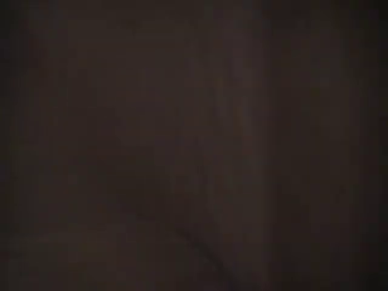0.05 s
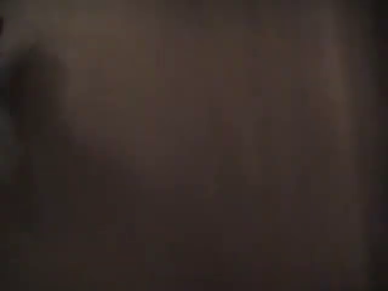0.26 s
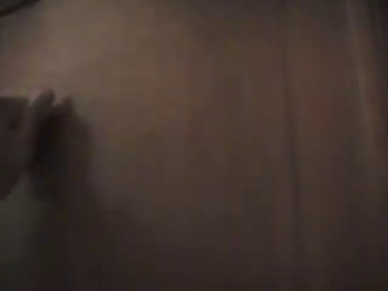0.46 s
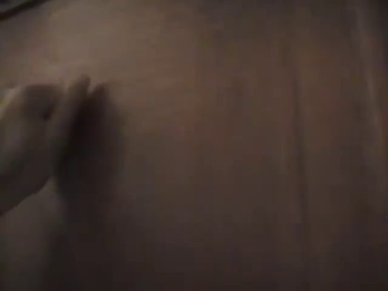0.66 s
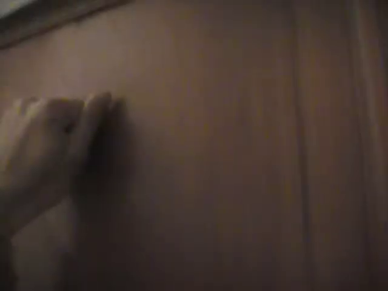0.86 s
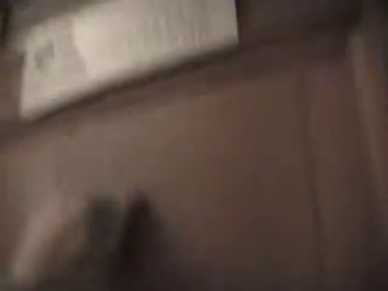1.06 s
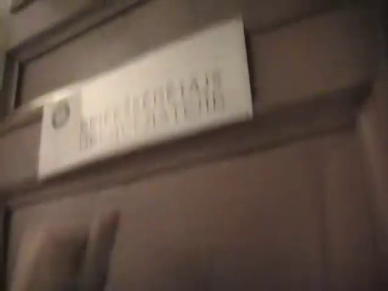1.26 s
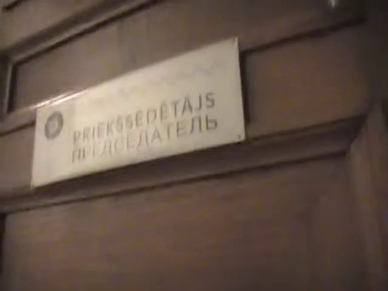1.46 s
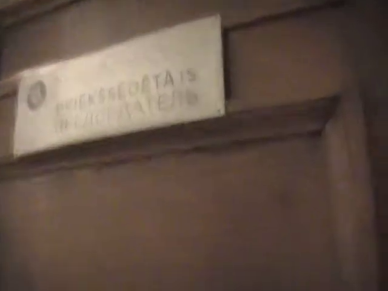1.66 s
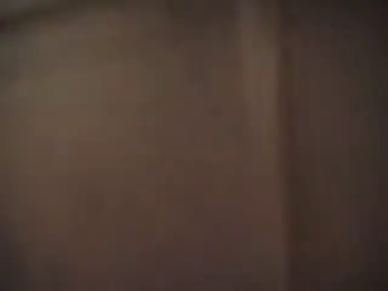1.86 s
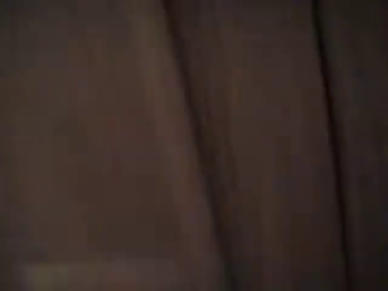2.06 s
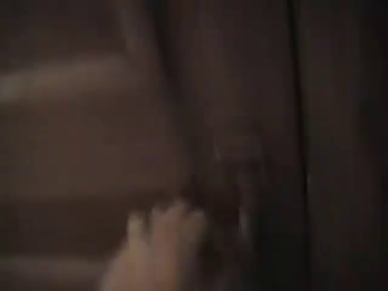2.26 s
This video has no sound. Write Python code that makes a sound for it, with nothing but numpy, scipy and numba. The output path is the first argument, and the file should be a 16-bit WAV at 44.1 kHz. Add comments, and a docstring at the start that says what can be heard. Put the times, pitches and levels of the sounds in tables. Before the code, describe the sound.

Close, loud, hollow door knocks in a bare reverberant hallway, stopping after about a second; then faint rubbing, a sharp metal latch click, a soft low bump and a handle clack, over light hiss from a small camera microphone.

```python
"""Knuckles rap quickly on a panelled wooden door in a bare, echoing corridor, close to a small camera:
each rap is a push that excites damped panel modes, dense wood vibration, one strong swing and a tick.
After a pause with soft scuffs (shaped noise) the latch clicks sharply (metal modes and noise bursts);
then the door bumps (a damped low tone) and the handle slides and clacks.
The camera's gain control turns loud knocks down and lets the quiet hiss swell back afterwards."""
import sys
import numpy as np
from scipy import signal
from scipy.fft import rfft, irfft, next_fast_len
from scipy.io import wavfile
from scipy.ndimage import uniform_filter1d
from numba import njit

SR = 44100
rng = np.random.default_rng(int(sys.argv[2]) if len(sys.argv) > 2 else 0)


def inscribe(sig):
    """Save sig as 16-bit PCM at rate SR to the path in sys.argv[1].

    A 1-D sig is mono; a 2-D sig holds one channel per row.
    Samples are clipped to [-1, 1] before scaling.
    """
    pcm = np.round(np.clip(np.atleast_2d(sig).T, -1, 1) * 32767)
    wavfile.write(sys.argv[1], SR, pcm.astype(np.int16))


N = 101253
T = np.arange(N) / SR
FREQS = np.maximum(np.arange(N // 2 + 1) * SR / N, 1)


def undb(db):
    """Logarithmic level: decibels to an amplitude factor."""
    return 10 ** (np.asarray(db) / 20)


def along(points, hz):
    """Spectral envelope: interpolate a table linearly on a log-frequency axis."""
    f, v = np.array(points, float).T
    return np.interp(np.log(hz), np.log(f), v)


def shape(x, gain):
    """Linear filtering: multiply the spectrum by a real gain that depends on frequency."""
    size = next_fast_len(x.shape[-1] + 4096, True)
    hz = np.maximum(np.arange(size // 2 + 1) * SR / size, 1)
    return irfft(rfft(x, size) * gain(hz), size)[..., :x.shape[-1]]


def fade(t60, size=N):
    """Exponential damping: the amplitude falls by 60 dB in t60 seconds."""
    return np.exp(-np.log(1000) * T[:size] / max(t60, 1e-4))


def add(out, x, start):
    """Superposition: mix a sound in at its time; what lies before time zero is cut off."""
    i = int(round(start * SR))
    x, i = x[:, max(-i, 0):], max(i, 0)
    n = min(x.shape[1], N - i)
    out[:, i:i + n] += x[:, :n]


# likeness of the two channels: (frequency [Hz], correlation [-1 to 1])
CHANNEL_LIKENESS = [(100, 0.9), (300, 0.91), (700, 0.5), (1400, 0.072), (2800, -0.13), (6000, -0.13),
                    (12000, -0.3)]


def noise(colour, size=N):
    """Spatial coherence: coloured stereo noise, rms 1, whose channels are more alike in the bass."""
    a, b = rng.standard_normal((2, size))

    def like(hz):
        return np.clip(along(CHANNEL_LIKENESS, hz), -.99, .99)

    mid = shape(a, lambda hz: undb(along(colour, hz)) * np.sqrt(1 + like(hz)))
    side = shape(b, lambda hz: undb(along(colour, hz)) * np.sqrt(1 - like(hz)))
    out = np.array([mid + side, mid - side])
    return out / out.std()


# spectrum of building air and microphone hiss: (frequency [Hz], relative density [dB])
AIR_SPECTRUM = [(25, -0.5), (200, 1.5), (600, 3.5), (1500, -4.5), (7500, -16.5), (11000, -13.5),
                (15500, -27)]
AIR_DB = -50


def air():
    """Stationary random noise: building air and microphone hiss as one steady coloured noise."""
    return undb(AIR_DB) * noise(AIR_SPECTRUM)


# widths [Hz] over which the spectrum of the echo is averaged
FINE_HZ, BROAD_HZ = 16, 110


def diffuse(x):
    """Modal overlap: even out narrow peaks, so that no single note of an echo stands out."""
    size = 2 * x.shape[1]
    spectrum = rfft(x, size)
    power = np.mean(np.abs(spectrum) ** 2, axis=0)
    broad, fine = (np.abs(uniform_filter1d(power, int(hz * size / SR))) for hz in (BROAD_HZ, FINE_HZ))
    return irfft(spectrum * np.sqrt(broad / fine), size)[:, :x.shape[1]]


# late decay of the corridor: (frequency [Hz], t60 [s])
CORRIDOR_T60 = [(100, 0.72), (250, 0.89), (1500, 0.9358), (4000, 0.95), (11000, .25)]
# colour of the corridor: (frequency [Hz], relative level [dB])
CORRIDOR_COLOUR = [(50, -11.5), (130, 4), (280, 2), (900, -8.5), (1900, -4), (2900, -8), (12000, -3.5)]
ROOM_BUILD_S = 0.0013  # time constant of the onset
EARLY_DB, EARLY_T60_S = 2.5, 0.096  # first reflections from the near walls


def corridor(size=42000):
    """Reverberation: octave bands of noise build up and each die at their own pace."""
    white = noise([(20, 0), (20000, 0)], size=size)
    centres = 62.5 * 2 ** np.arange(9)
    early = undb(EARLY_DB) * fade(EARLY_T60_S, size=size)
    onset = 1 - np.exp(-T[:size] / ROOM_BUILD_S)
    out = 0
    for k, centre in enumerate(centres):

        def octave(hz):
            crossfade = np.interp(np.log(hz), np.log(centres), np.arange(9) == k)
            return crossfade * undb(along(CORRIDOR_COLOUR, hz))

        tail = (fade(along(CORRIDOR_T60, centre), size=size) + early) * onset
        out = out + shape(white, octave) * tail / np.sqrt(np.sum(tail ** 2))
    return diffuse(out)


def in_room(x, room, wet_db):
    """Convolution with an impulse response: a sound followed by its echo."""
    out = undb(wet_db) * signal.fftconvolve(x[:1], room, axes=1)  # the left channel feeds the echo
    out[:, :x.shape[1]] += x
    return out


NEAR_SIDE_DB = -6  # a near source is more alike in the two channels than its echo


def burst(colour, t60, size=8192):
    """High modal density: a sudden, decaying spray of vibration close to the microphones."""
    x = noise(colour, size=size) * fade(t60, size=size)
    mid = x.mean(axis=0)
    return mid + undb(NEAR_SIDE_DB) * (x - mid)


def struck(colour, t60, room, wet_db):
    """Direct and reverberant sound: a burst, followed by a smooth echo of the same colour."""
    direct = burst(colour, t60)
    # the coloured echo is scaled to the energy of the burst
    gain = np.sqrt(np.sum(direct ** 2) / 2 / np.mean(undb(along(colour, FREQS)) ** 2))
    out = undb(wet_db) * gain * shape(room, lambda hz: undb(along(colour, hz)))
    out[:, :direct.shape[1]] += direct
    return out


# scuffs: (time [s], low rub level [dB], hiss level [dB], hiss cut-off [Hz], rise [s], t60 [s])
SCUFFS = [(1.15, -67, -52, 13100, 0.34, 4.5), (1.431, -32.5, -38, 6200, 0.0037, 0.34),
          (1.955, -30, -41.5, 12000, 0.046, 0.28), (2.198, -50.5, -41, 14200, 0.027, 1.4)]
# spectrum of the dull rub: (frequency [Hz], relative level [dB])
RUB_SPECTRUM = [(100, -22), (300, 8.5), (650, 7), (1200, -5), (3000, -11), (12000, -56.5)]
# spectrum of the sliding hiss before its cut-off: (frequency [Hz], relative level [dB])
SWISH_SPECTRUM = [(500, -30), (1500, -3), (4300, 4.5), (7000, 1), (11000, 9), (16000, 0.5)]
GRIT_DB, GRIT_S = 2.5, 0.001  # rms of the hiss's level flutter, and its averaging time


def scuffs(size=44000):
    """Friction noise: a dull rub and a gritty hiss swell and die away together."""
    out = np.zeros((2, N))
    for start, rub_db, hiss_db, top_hz, rise, t60 in SCUFFS:
        swell = np.minimum(T[:size] / max(rise, 1e-3), 1) * fade(t60, size=size)
        grit = uniform_filter1d(rng.standard_normal(size), max(int(GRIT_S * SR), 1))
        hiss = shape(noise(SWISH_SPECTRUM, size=size), lambda hz: 1 / np.hypot(1, (hz / top_hz) ** 4))
        hiss = hiss * undb(GRIT_DB * grit / grit.std())
        rub = noise(RUB_SPECTRUM, size=size)
        add(out, swell * (undb(rub_db) * rub + undb(hiss_db) * hiss), start)
    return out


BUMP_S, BUMP_HZ, BUMP_DB = 2.1975, 231, -15
BUMP_T60_S, BUMP_RISE_S, BUMP_ROOM_DB = 0.026, 0.0034, -1


def bump(room, size=8192):
    """Damped resonance: a soft, low bump on the door, one tone that rises and dies quickly."""
    out, t = np.zeros((2, N)), T[:size]
    rise = 1 - np.exp(-t / BUMP_RISE_S)
    thud = -np.sin(2 * np.pi * BUMP_HZ * t) * fade(BUMP_T60_S, size=size) * rise
    add(out, undb(BUMP_DB) * in_room(np.array([thud, thud]), room, BUMP_ROOM_DB), BUMP_S)
    return out


# latch clicks and rattles: (time [s], metal level [dB], door body level [dB])
CLICKS = [(1.8316, -39, -65), (1.8770, -16, -30.5), (1.8797, -23, -28.5), (1.898, -35, -30),
          (1.979, -42, -38), (2.043, -48, -52), (2.2872, -23, -57), (2.2903, -20, -27)]
# spectrum of the metal snap: (frequency [Hz], relative level [dB])
METAL_SPECTRUM = [(100, -11), (400, -10), (900, 7), (1700, 9), (2800, 0), (8000, 2), (11000, 4),
                  (16000, -6)]
METAL_T60_S, METAL_ROOM_DB = 0.026, -3
# spectrum of the jolted door body: (frequency [Hz], relative level [dB])
BODY_SPECTRUM = [(50, -22), (120, 3.5), (500, -0.5), (800, 6.5), (1200, -4), (3500, -13.5), (14000, -43)]
BODY_T60_S, BODY_ROOM_DB = 0.18, 5.5
# ringing modes of the latch: (frequency [Hz], relative level [dB])
LATCH_MODES = [(790, -1.5), (9620, 0), (10050, -19), (12550, -12)]
LATCH_DB, LATCH_T60_S = -7.5, 0.015


def latch(room, size=8192):
    """Impact excitation: metal snaps against metal, rings briefly, jolts the door and rattles."""
    out = np.zeros((2, N))
    modes = sum(undb(db) * np.sin(2 * np.pi * hz * T[:size]) for hz, db in LATCH_MODES)
    ring = undb(LATCH_DB) * fade(LATCH_T60_S, size=size) * modes
    for start, metal_db, body_db in CLICKS:
        snap = struck(METAL_SPECTRUM, METAL_T60_S, room, METAL_ROOM_DB)
        # swapped echo channels set the body's echo apart from the metal's
        jolt = struck(BODY_SPECTRUM, BODY_T60_S, room[::-1], BODY_ROOM_DB)
        add(out, undb(metal_db) * np.array([ring, ring]), start)
        add(out, undb(metal_db) * snap, start)
        add(out, undb(body_db) * jolt, start)
    return out


# faint taps between the knocks: (time [s], level [dB])
FAINT_TAPS = [(0.734, -32), (0.924, -36)]
# spectrum of a tap: (frequency [Hz], relative level [dB])
TAP_SPECTRUM = [(2000, -22.5), (2800, 3), (3500, -28), (14000, -28)]
TAP_T60_S = 0.013


def taps():
    """Transient excitation: faint, short bursts of narrow-band noise, without echo."""
    out = np.zeros((2, N))
    for start, db in FAINT_TAPS:
        add(out, undb(db) * burst(TAP_SPECTRUM, TAP_T60_S), start)
    return out


# door modes: (frequency [Hz], relative level [dB], t60 [s])
DOOR_MODES = [(122.7, -19.5, 0.2), (152.9, -19.5, 0.28), (207.3, -22, 0.35), (242, -16.5, 0.1),
              (384.4, -12, 0.085), (482, -2.5, 0.068), (527.7, -5.5, 0.053), (598.5, -10.5, 0.062),
              (648, -8, 0.06), (790.5, -10, 0.12), (874, -6.5, 0.11), (1138, -10, 0.019),
              (1441, 0.5, 0.054)]
DOOR_DB = -3.5
MODE_PAN_DB, MODE_PHASE = -2.5, 0.36  # level difference of the channels; phase either way [rad per kHz]


def panel(size=16384):
    """Modal superposition: damped door modes reach the two microphones a little differently."""
    out, side = np.zeros((2, size)), np.array([[1], [-1]])
    for hz, db, t60 in DOOR_MODES:
        lag = side * MODE_PHASE * hz / 1000
        wave = np.cos(2 * np.pi * hz * T[:size] - lag)
        out += undb(db + side * MODE_PAN_DB / 2) * fade(t60, size=size) * wave
    return undb(DOOR_DB) * out


THRUST_DB = -8


def thrust(hz, size=512):
    """Elastic recoil: the panel gives under the knuckle and springs back in one strong swing."""
    turn = np.minimum(T[:size] * hz * 2 / 3, 1)  # over after 1.5 periods of hz
    swing = np.sin(2 * np.pi * turn) * np.sin(np.pi * turn)
    return undb(THRUST_DB) * np.array([swing, swing])


# centres [Hz] and widths [octaves] of the three mode groups that depend on the place struck
LOW_HZ, MIDDLE_HZ, UPPER_HZ = 358.5, 754, 1206
LOW_OCTAVES, MIDDLE_OCTAVES, UPPER_OCTAVES = 0.32, 0.5, 0.14


def place_gain(hz, low_db, middle_db, upper_db):
    """Mode-shape weighting: the place struck sets how strongly each group of modes answers."""
    def bell(centre, octaves):
        return np.exp(-.5 * (np.log2(hz / centre) / octaves) ** 2)

    return undb(low_db * bell(LOW_HZ, LOW_OCTAVES) + middle_db * bell(MIDDLE_HZ, MIDDLE_OCTAVES)
                + upper_db * bell(UPPER_HZ, UPPER_OCTAVES))


# knocks, the first already under way at time zero: (time [s], level [dB], contact cut-off [Hz],
# low modes [dB], middle modes [dB], upper modes [dB], first swing [Hz], relative knuckle tick [dB])
KNOCKS = [(-.07, -1, 1710, 2.5, 10, 2.5, 700, -20), (0.1606, 2, 2360, 6.5, -7.5, 10.5, 460, 18),
          (0.387, 3, 1870, -12, 7.5, 3.5, 765, 18), (0.6117, -1.5, 1150, -7, 9.5, 3, 678, 12.5),
          (0.7981, -9, 1070, 17.5, 11, 21.5, 654, 5.5), (1.0010, -4, 1170, -1.5, 8.5, 12.5, 650, 10.5)]
# spectrum of the dense, quickly damped wood vibration: (frequency [Hz], relative density [dB])
WOOD_SPECTRUM = [(50, -28), (120, -4), (400, -1.5), (800, 3), (1020, -6), (1600, -1), (2700, -9),
                 (6000, -26)]
WOOD_DB, WOOD_T60_S = -3.5, 0.073
WOOD_PLACE_SHARE = 0.58  # the dense vibration depends less on the place struck
# spectrum of the knuckle tick: (frequency [Hz], relative level [dB])
TICK_SPECTRUM = [(500, -27), (2000, -5), (3300, 2), (5500, -7), (16000, -19)]
TICK_DB, TICK_T60_S = -30, 0.01
TICK_LAG_S = .0004  # the tick comes at the height of the push
MODES_ROOM_DB, WOOD_ROOM_DB, TICK_ROOM_DB = -6.5, 6, -5.5
PUSH_S = 0.00044  # the skin over the knuckle rounds the start of each push
SWAY_HZ, SWAY_DB, SWAY_T60_S = 44.5, -38.5, 2.8


def sway():
    """Free vibration: the leaf sways steadily in its frame and dies away after the last knock."""
    since = np.maximum(T - KNOCKS[-1][0], 0)
    return undb(SWAY_DB) * np.sin(2 * np.pi * SWAY_HZ * T) * np.exp(-np.log(1000) * since / SWAY_T60_S)


def knocks():
    """Source and resonator: each push swings the panel once and rings it; a higher cut-off is brighter."""
    out, door = np.zeros((2, N)), panel()
    push = np.sin(np.pi * np.minimum(T[:128] / PUSH_S, 1)) ** 2
    for start, db, contact_hz, low_db, middle_db, upper_db, swing_hz, tick_db in KNOCKS:
        room = corridor()  # the camera moves, so each knock has an echo of its own

        def place(hz):
            return place_gain(hz, low_db, middle_db, upper_db)

        modes = in_room(door, room, MODES_ROOM_DB)[:, :room.shape[1]]
        wood = undb(WOOD_DB) * struck(WOOD_SPECTRUM, WOOD_T60_S, room, WOOD_ROOM_DB)
        rap = shape(modes, place) + shape(wood, lambda hz: place(hz) ** WOOD_PLACE_SHARE)
        rap = signal.lfilter(push / push.sum(), 1, rap)
        contact = signal.butter(2, min(contact_hz, SR / 4), fs=SR, output="sos")
        tick = undb(TICK_DB + tick_db) * struck(TICK_SPECTRUM, TICK_T60_S, room, TICK_ROOM_DB)
        add(out, undb(db) * signal.sosfilt(contact, rap), start)
        add(out, undb(db) * thrust(swing_hz), start)
        add(out, tick, start + TICK_LAG_S)
    return out


LEFT_DB = 1  # level of the left channel over the right


def scene():
    """Linear superposition: door, latch and scuffs in the corridor over quiet air."""
    room = corridor()
    sounds = air() + scuffs() + bump(room) + latch(room) + taps() + sway() + knocks()
    return sounds * undb(np.array([[LEFT_DB], [-LEFT_DB]]) / 2)


@njit
def follow(x, attack, release, e):
    """Envelope detection: a level that rises fast and falls slowly, starting from e."""
    out = np.empty(len(x))
    for i in range(len(x)):
        e += (x[i] - e) * (attack if x[i] > e else release)
        out[i] = e
    return out


THRESHOLD_DB, RATIO, DRIVE = -8.5, 2.99, 0.95
ATTACK_S, RELEASE_S = 0.0025, 0.4  # time constants
START_DB = -5  # level that the gain control holds from the knocking so far
TOP_HZ = 15800


def record(dry):
    """Dynamic compression: gain control, then soft overload of strong peaks and a steep top cut."""
    attack, release = 1 / (max(ATTACK_S, 1e-4) * SR), 1 / (RELEASE_S * SR)
    loud = follow(np.abs(dry).max(axis=0), attack, release, float(undb(START_DB)))
    excess = np.maximum(loud / undb(THRESHOLD_DB), 1)
    x = DRIVE * dry * excess ** (1 / max(RATIO, 1) - 1)
    x = x / (1 + x ** 4) ** .25
    return signal.sosfilt(signal.ellip(8, .2, 70, TOP_HZ, fs=SR, output="sos"), x)


dry = scene()
out = record(dry)
inscribe(out)
```